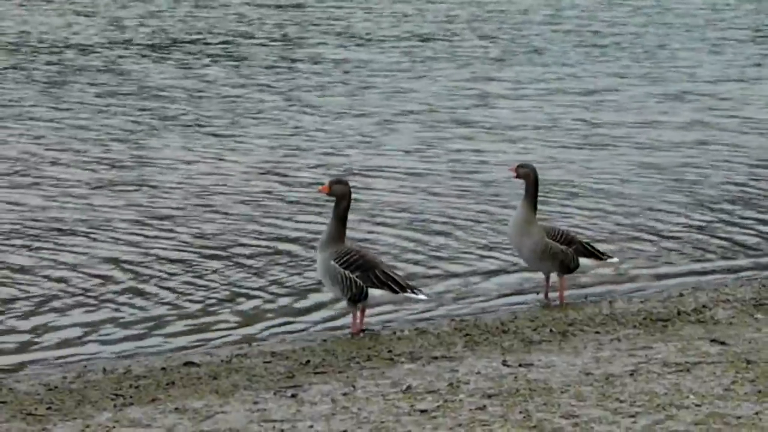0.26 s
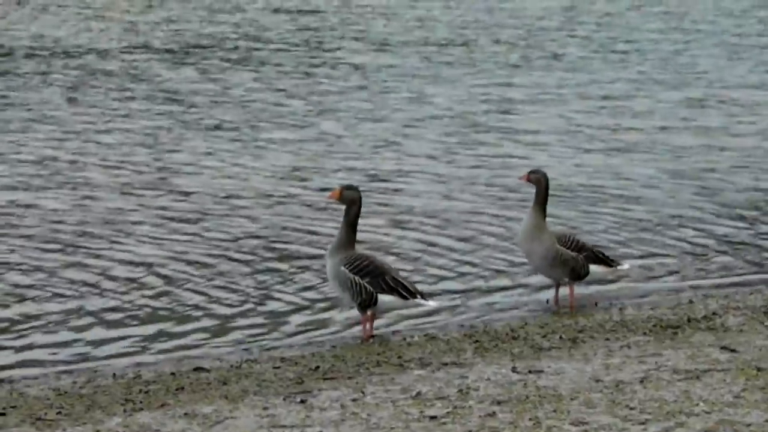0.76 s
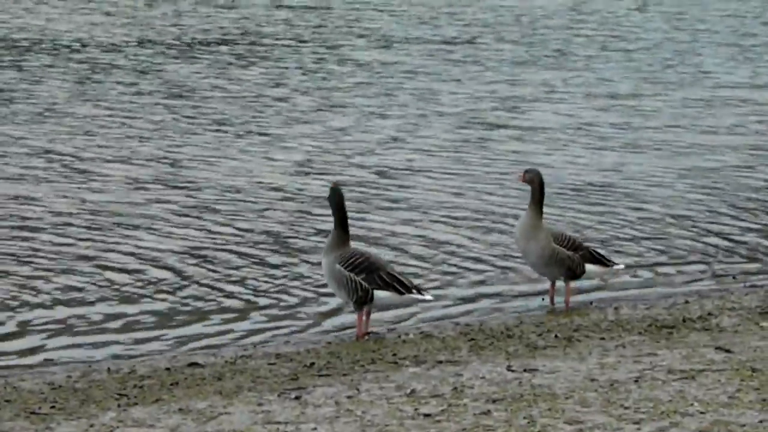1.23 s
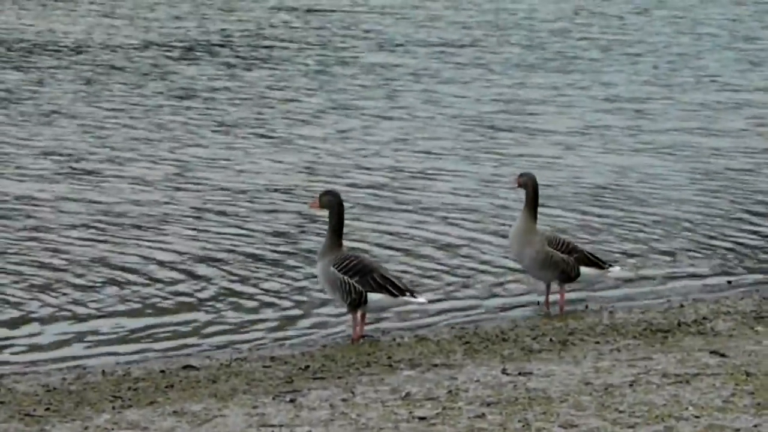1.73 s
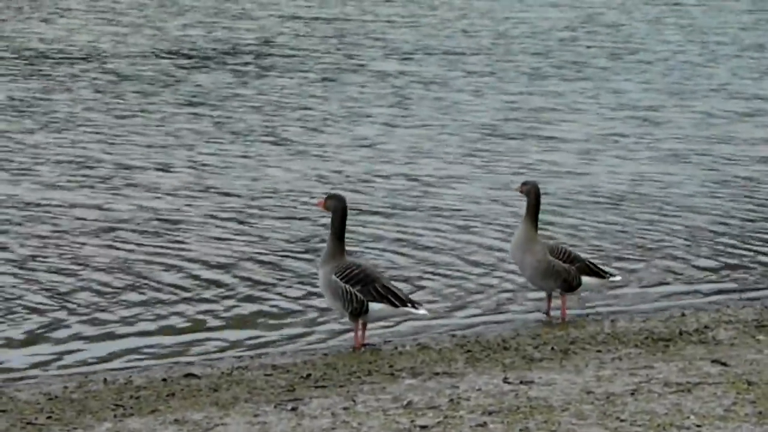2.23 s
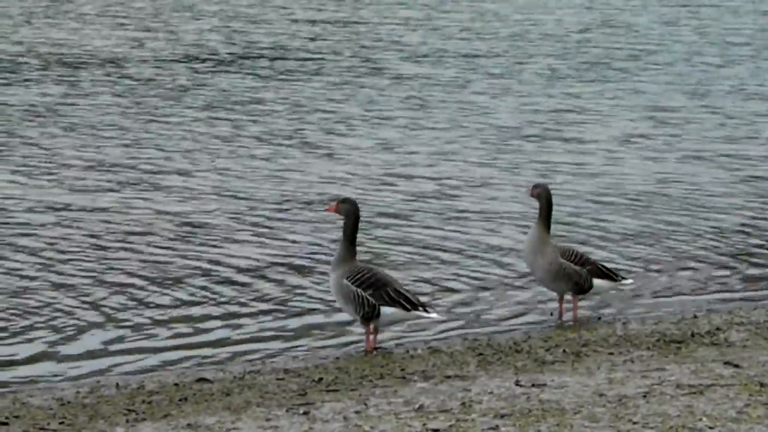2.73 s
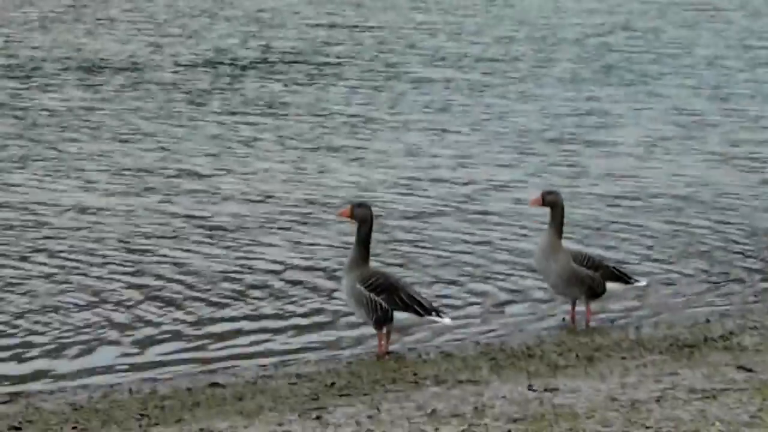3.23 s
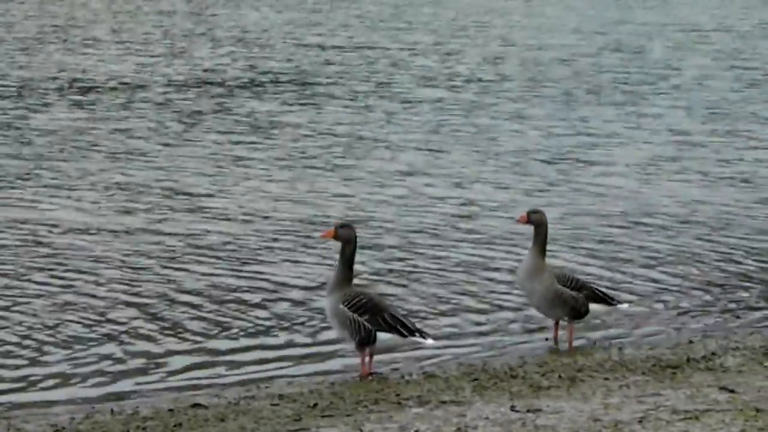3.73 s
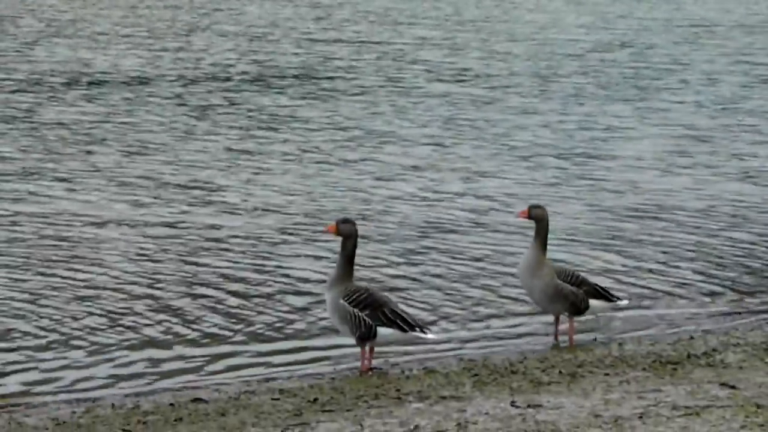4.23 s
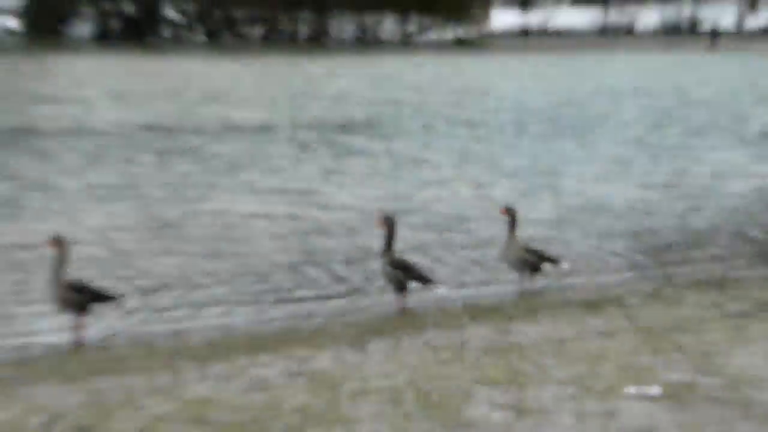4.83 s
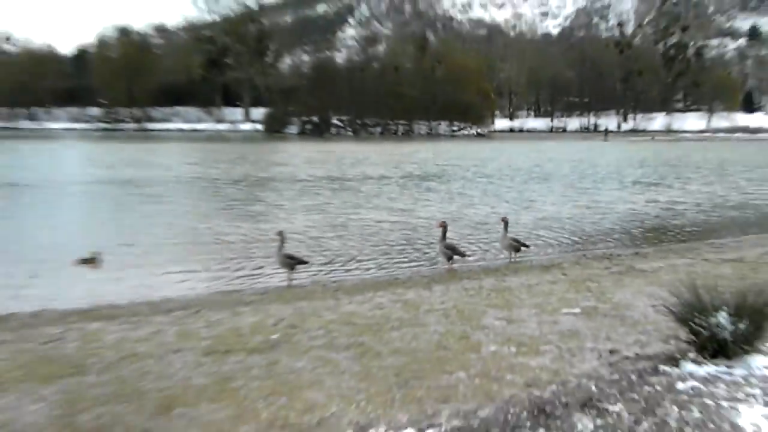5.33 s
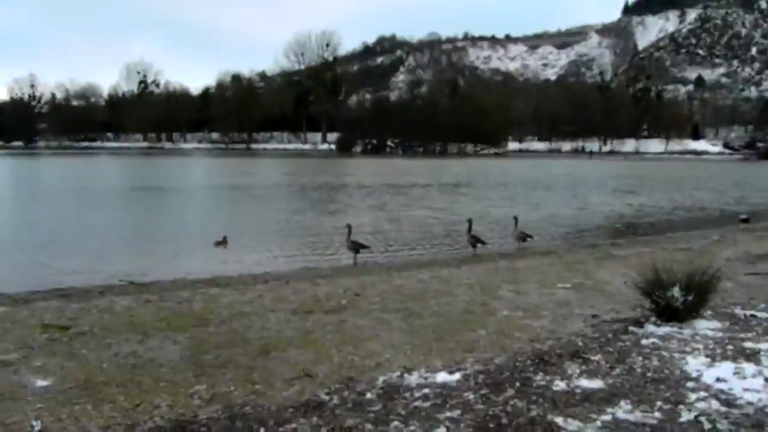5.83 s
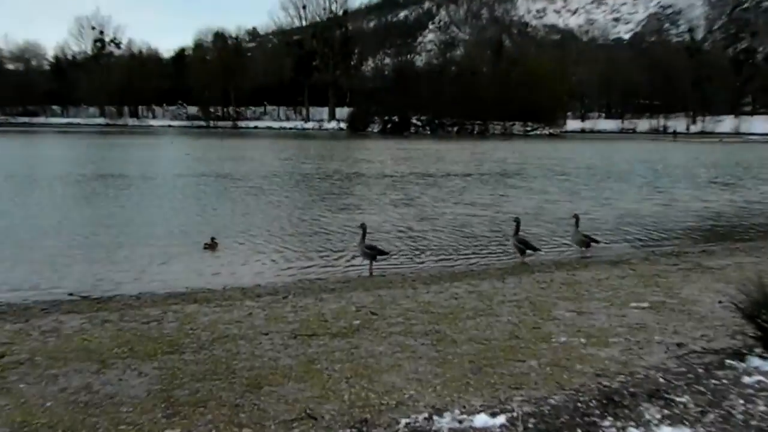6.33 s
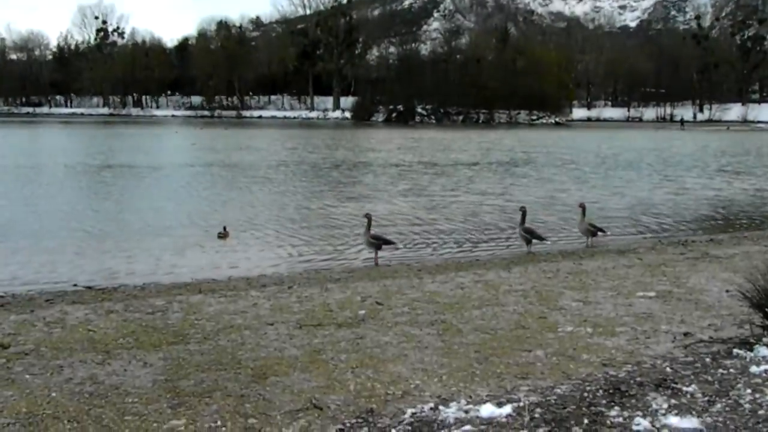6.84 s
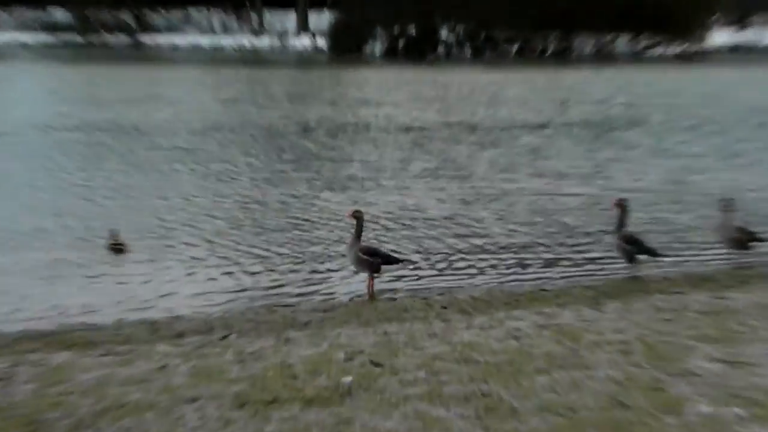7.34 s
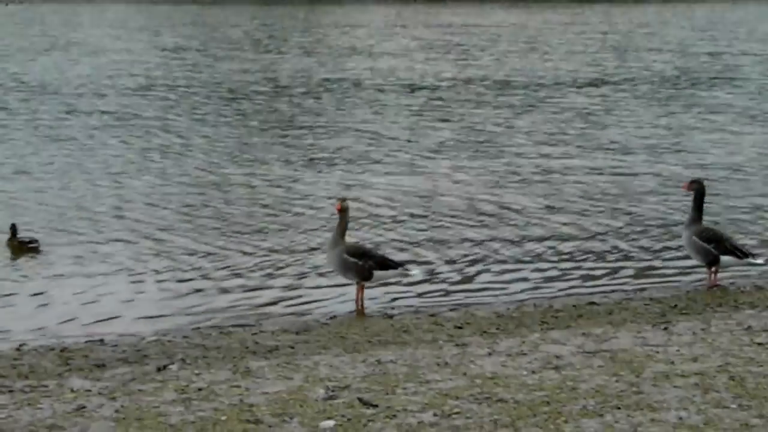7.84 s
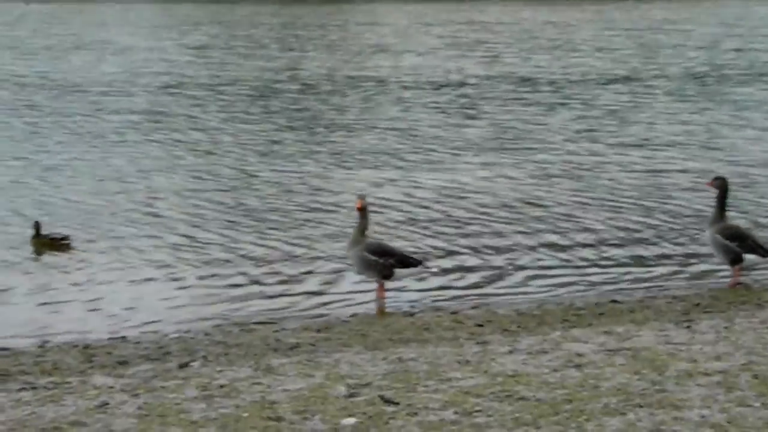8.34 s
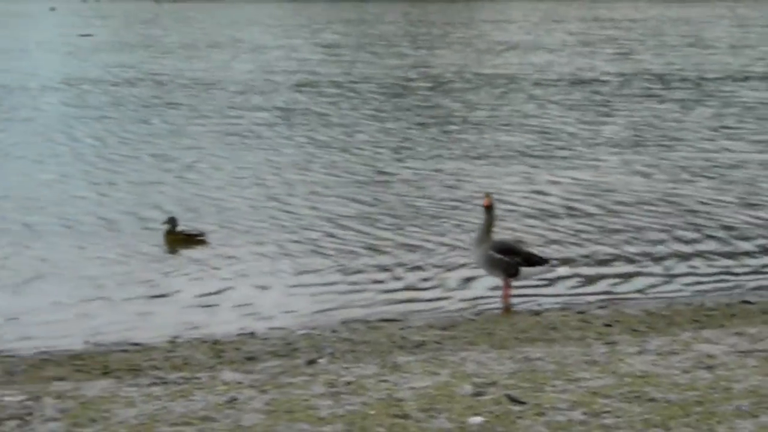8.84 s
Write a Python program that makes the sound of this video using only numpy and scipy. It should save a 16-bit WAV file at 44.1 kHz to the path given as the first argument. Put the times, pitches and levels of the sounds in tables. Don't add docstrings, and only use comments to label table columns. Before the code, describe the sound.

Irregular runs of bright, nasal goose honks, each about a tenth of a second, alternate with gravelly throat rasps and two deeper honks. After the midpoint the camera's thin zoom whine runs on and off, very close, with plastic ticks. Far whistling cries and a fading hiss follow, then small button clicks and two final honks. Open lakeside, low wind-and-water murmur, birds moderately near the microphone.

```python
import sys
import numpy as np
from scipy import signal
from scipy.io import wavfile
from scipy.ndimage import uniform_filter1d

SR = 44100
rng = np.random.default_rng(int(sys.argv[2]) if len(sys.argv) > 2 else 0)


def boost_factor(decibels):
    exponent = np.asarray(decibels, float) / 20
    return 10 ** exponent


def log_audio(samples):
    frames = np.atleast_2d(samples).T
    limited = np.clip(frames, -1, 1)
    pcm = np.round(limited * 32767).astype(np.int16)
    wavfile.write(sys.argv[1], SR, pcm)


N = 399987

# (time [s], level [dB])
WASH_COLOUR = [(30, -36), (42, -17), (60, -4.5), (120, -7.5), (200, -14), (310, -9), (500, -4.5), (800, 0),
               (1250, -4), (2000, -6), (2600, -16.5), (3500, -5), (5000, -19), (6500, -28), (15700, -35.5)]
WASH_LEVEL = [(0, -45.5), (2.299, -46.5), (4.499, -45), (6.801, -45), (9.07, -45)]
# (start [s], upper throat resonance [dB], lower one [dB], top pitch [Hz], pitch peaks after [s])
HONKS = [(-.14, 1, -15, 895, 0.068), (0.246, -14.5, -18.5, 887.7, 0.04), (0.616, -8.5, -18.5, 870, 0.036),
         (1.068, -12, -19, 884.3, 0.0407), (1.776, -15, -39, 892, 0.043), (1.856, -11.5, -29, 846, 0.061),
         (2.626, -11.5, -25.5, 880, 0.034), (2.915, -9, -19.5, 871, 0.05), (4.06, -12.5, -16, 888, 0.053),
         (4.679, -9.5, -20.5, 849, 0.025), (4.908, -10.5, -41, 941.5, 0.1), (4.99, -15.5, -25, 854, 0.028),
         (5.203, -9.5, -14, 885, 0.069), (5.554, -11, -15, 892, 0.059), (6.723, -13.5, -15, 889.3, 0.055),
         (6.97, -9.5, -15.5, 875, 0.062), (7.279, -12, -10.5, 900.6, 0.065),
         (8.598, -14.5, -14, 887, 0.036), (8.817, -14.5, -18, 875, 0.076)]
THIN_HONKS = [(0.252, -28, -39, 1085, 0.02), (1.782, -13, -34, 1150, 0.0697),
              (4.955, -44, -30.5, 1165, 0.035), (6.098, -34, -53, 1197, 0.0264),
              (6.207, -28, -55, 1213, 0.031)]
# (from [s], until [s], stutter left in [0-1], brightness [dB], voice breaks after [s])
HONK_CLEAR = [(-.11, -0.036, 0, -5, 0.13), (0.279, 0.381, 0.08, -9, 0.073),
              (0.634, 0.708, 0.14, -4, 0.0023), (1.078, 1.204, 0.03, -7.5, 0.072),
              (1.782, 1.826, 0.45, -2, 0.051), (1.879, 1.945, 0.1, -7.5, 0.013),
              (2.649, 2.757, 0.17, -8.5, 0.069), (2.931, 3.009, .12, -6.5, 0.001),
              (4.087, 4.182, 0.15, 1, 0.067), (4.705, 4.744, 0.06, -5.5, 0.00058),
              (4.92, 4.972, 0.04, 1.5, 0.067), (5.025, 5.049, 0.4, -5.5, 0.0036),
              (5.223, 5.313, 0.07, -3.5, 0.0014), (5.572, 5.705, 0.05, -2, 0.072),
              (6.738, 6.826, 0.05, -9, 0.055), (6.998, 7.077, 0, -7.5, 0.0011),
              (7.295, 7.42, 0.05, 1.5, 0.08), (8.611, 8.709, 0.17, -4, 0.055),
              (8.842, 8.951, 0, -9.5, 0.0026)]
THIN_CLEAR = [(0.257, 0.311, 0.59, 8, 0.0042), (1.805, 1.926, 0.2, -12, 0.026),
              (4.976, 5.01, 0.31, -37, .01), (6.108, 6.12, 0.28, -15, .1), (6.231, 6.21, 0.86, -11, .1)]
# (pitch lost [share/s], top held [ms], effort peaks after [ms], stuttering end [dB])
HONK_BENDS = [(1.3, 2, 32, -5.5), (0.79, 9.2, 50, 1.5), (2.8, 4.7, 31, 0), (.95, 4.5, 41, -2),
              (3.6, 7.1, 67, 0), (3.3, 1.1, 44, 2), (0.37, 2, 65, -7.5), (3.1, 3.1, 31, -1),
              (1.1, 4.6, 57, 0), (1.3, 2.8, 43, -6), (1.4, 2, 7.3, 4.5), (0.88, 1.6, 25, -0.5),
              (2.6, 6.3, 64, -4.5), (0.55, 3, 48, 3), (1.8, 2.9, 43, -1.5), (2.1, 3.3, 54, -3),
              (1.4, 4.5, 23, 2.5), (1.1, 6.8, 33, 0), (4.5, 12, 59, -6)]
THIN_BENDS = [(1.2, 2.2, 11, -1.7), (0.48, 20, 89, -2.2), (0.95, 7.9, 36, -1.4), (1.4, 1, 29, -0.25),
              (1.9, 1, 66, -0.22)]
# (frequency [Hz], level [dB])
THROAT_LOW = [(600, -32.5), (870, -32), (1750, -35.5)]
THROAT_LOWER = [(2350, 11.5), (2650, -1.5), (3000, -14.5)]
THROAT_UPPER = [(3500, 0)]
THROAT_CLOSING = [(4400, -13)]
THROAT_TOP = [(5200, -13), (6100, -32.5), (7100, -27.5), (7900, -36.5), (8800, -30), (9700, -47),
              (10500, -56), (14000, -63)]
# (from [s], until [s], depth [0-1])
DOUBLING = [(.255, .325, .4), (1.79, 1.9, .5), (4.935, 4.985, .55), (4.99, 5.05, .6), (7.315, 7.38, .4),
            (7.42, 7.47, .6)]
SIDE_ABOVE_DB = [-20.5, -6.5, -53.5, -5, -4.5, -12.5, -35.5, -24.5, -24, -27.5]
SIDE_BELOW_DB = [-26, -50.5, -12, -13.5, -9, -10, -35, -32.5, -37, -23]
# (time [s], peak [dB], ring [Hz], treble [dB])
TICKS = [(0.103, -27.5, 1920, -50), (0.209, -24.5, 2170, -18), (0.475, -30, 1840, -43),
         (0.567, -38, 1820, -22), (1.205, -11.5, 2360, -33), (2.433, -30.5, 895, -20),
         (2.758, -15.5, 815, -18), (2.779, -20, 2030, -26), (3.201, -29, 1650, -23),
         (3.216, -22, 3860, -23), (3.555, -19.5, 1110, -22), (3.963, -20.5, 1670, -16.5),
         (4.042, -21.5, 3860, 0), (4.376, -19, 2000, -16), (4.413, -13.5, 3080, -31),
         (4.469, -11, 2970, -29), (5.926, -11, 2930, -40), (5.999, -15, 3200, -23),
         (6.567, -12.5, 1480, -16), (6.711, -18, 3520, -5), (6.88, -22.5, 3680, -5),
         (7.559, -8.5, 2340, -6.5), (8.195, -28.5, 2860, -21), (8.452, -19, 4760, -32),
         (8.457, -18, 3750, -17), (8.494, -28, 3680, -17), (8.793, -21.5, 3450, -45),
         (8.998, -15.5, 3640, -71),
         (2.566, -3, 4830, -12),
    (2.569, -15.5, 4020, -36),
    (2.582, -3, 3550, -5),
    (2.592, -4.5, 4700, -11),
    (2.601, -14, 3430, -51),
]
# (frequency [Hz], level [dB per Hz])
TICK_COLOUR = [(240, -59.5), (400, -55.5), (739, 4.5), (1100, 1), (2270, 6), (3650, -1), (6150, -4.5),
               (7750, -16.5), (8490, -7.5), (15700, -53)]
# (time [s], peak
# [dB], ring [Hz])
SNAPS = [
    (.208, -27, 2100),
    (1.2048, -2.5, 1900),
    (1.322, -17, 1900),
    (1.332, -20, 2000),
    (1.3765, -23, 1750),
    (1.4495, -11, 1850),
    (1.4555, -9, 1900),
    (1.4595, -11, 1850),
    (1.541, -10, 1900),
    (2.214, -6, 1850),
]
# (start [s], length [s], level [dB], middle of the strong-weak beats [s])
RASPS = [
    (0.741, 0.12, -24.5, .85),
    (1.367, .18, -21, 1.496),
    (2.116, 0.172, -20, 2.229),
    (2.913, .145, -21.5, 3.016),
    (3.603, 0.16, -21.5, 3.71),
]
# (frequency [Hz], width [Hz], level [dB])
RASP_THROAT = [(1818, 315, 3), (1282, 87, -11), (2205, 130, -22)]
RASP_BILL = [(3060, 1300, -12.5), (4070, 270, -15), (5310, 830, -18.5), (6800, 700, -25.5),
             (7100, 270, -38), (8800, 630, -50.5)]
# (start [s], length [s], level [dB], top pitch [Hz], brightness [dB])
DEEP_HONKS = [
    (1.246, 0.12, -17.5, 596.5, -6.5),
    (7.578, 0.12, -14.5, 606, -2),
]
# (multiple, level [dB])
DEEP_TONES = [(1, -18), (2, -16), (3, -9.5), (4, -2), (5, -15.5), (6, -6), (7, -5.5), (8, -3.5), (9, -11),
              (10, -18), (11, -34.5), (12, -15.5), (13, -19), (14, -8), (15, -15.5), (16, -20.5)]
# (time [s], pitch [Hz], level [dB])
TRILL = [
    [(2.03, 3740, -66), (2.056, 3599, -82), (2.13, 3630, -60)],
    [(2.3, 3685, -73), (2.338, 3760, -70), (2.55, 3450, -85)],
    [(6.44, 3650, -46.5), (6.6, 3660, -43.5), (6.645, 3800, -51)],
]
# (time [s], peak [dB])
SPARKS = [
    (2.565, -27),
    (5.989, -35.5),
    (6.083, -41),
    (6.186, -53.5),
    (6.395, -41),
    (6.568, -31),
    (7.56, -22.5),
]
# (time [s], level [dB])
HISSES = [
    [(3.22, -75), (3.634, -47.5), (3.78, -54.5)],
    [(7.6, -48.5), (7.824, -50.5), (8.15, -59.5)],
]
# (frequency [Hz], level [dB per Hz])
HISS_COLOUR = [(1180, -56), (2000, -5), (2980, -2.5), (4060, -1), (6050, 0.5), (7790, -26), (8950, -14),
               (14000, -47.5)]
# (time [s], peak [dB])
THUMPS = [
    (3.962, -26.5),
    (4.472, -19.5),
    (5.958, -25),
    (6.568, -26),
]
# (time [s], level [dB])
ZOOM_RUNS = [
    [(4.44, -52.5), (4.55, -53.5), (5.78, -56.5)],
    [(5.915, -50.5), (6.07, -55.5)],
    [(6.26, -52), (6.435, -54.5)],
    [(6.96, -57.5), (7.15, -53.5), (7.66, -56)],
]
# (frequency [Hz], level [dB per Hz])
GEAR_COLOUR = [(180, -44), (300, -9.5), (425, -50), (810, -37.5), (880, -40), (925, -19), (2420, 1),
               (2900, -4.5), (4690, -5), (6210, -4.5), (7830, -18), (8650, -19.5), (15700, -39.5)]
# (frequency [Hz], width [Hz], level [dB])
WHINES = [(3020, 420, 0), (3550, 400, -5), (5800, 700, -20), (11700, 700, -32), (14600, 600, -36)]
# (time [s], pitch [Hz], level [dB])
FAR_CRIES = [
    [(7.06, 930, -53), (7.076, 1133, -34.5), (7.136, 1089, -39), (7.17, 930, -46)],
    [(7.2, 930, -39), (7.232, 1138, -38), (7.254, 1168, -39.5), (7.31, 930, -39)],
    [(7.4, 941, -48), (7.412, 1140, -38), (7.516, 1048, -45), (7.56, 1167, -30)],
    [(7.58, 1193, -39), (7.652, 1208, -53), (7.692, 1124, -40), (7.72, 1207, -41)],
]
# (time [s], peak [dB])
BUTTON_CLICKS = [
    (8.226, -17.5),
    (8.233, -21),
    (8.325, -20.5),
    (8.3297, -15),
    (8.426, -14.5),
    (8.433, -18.5),
]
# (frequency [Hz], level [dB], time to die by 60 dB [s])
BUTTON_MODES = [(3450, -1.5, 0.02), (3860, -5, 0.022), (2640, -21, 0.043), (5300, -13.5, 0.0091),
                (7050, -31, .02)]
# (frequency [Hz], width [Hz], share removed [0-1])
NOTCHES = [(7860, 330, 0.95), (195.4, 140, 0.83)]


def evened(x):
    return x / np.sqrt(np.mean(x ** 2) + 1e-20)


def add(mix, s, sound):
    part = mix[round(s * SR):][:len(sound)]
    part += sound[:len(part)]


def unroll(rows):
    s, *columns = np.transpose(rows)
    t = np.arange(s[0], s[-1], 1 / SR)
    return t, *(np.interp(t, s, c) for c in columns)


def resonate(x, hz, width_hz):
    turn = np.exp(2j * np.pi * np.cumsum(hz * np.ones(len(x))) / SR)
    r = np.exp(-np.pi * width_hz / SR)
    return 2 * (turn * signal.lfilter([1 - r], [1, -r], x / turn)).real


def resonate_twice(x, hz, width_hz):
    return resonate(resonate(x, hz, width_hz), hz, width_hz)


def wander(n, hz, size=16000):
    slow = signal.lfilter(*signal.butter(2, hz, fs=SR), rng.standard_normal(size))
    return evened(slow[4000:])[:n]


def noise(colour, patchy_db, size):
    hz = np.fft.rfftfreq(1024, 1 / SR)
    f, db = np.transpose(colour)
    a, b, patches = rng.standard_normal((size // 256 + 5, 513, 3)).T
    patches = uniform_filter1d(patches, size=10, axis=0)
    patches = evened(uniform_filter1d(patches, size=12, axis=1))
    colour_db = np.interp(np.log(hz + 1), np.log(f), db)[:, None]
    z = (a + 1j * b) * boost_factor(colour_db + patchy_db * patches)
    return evened(signal.istft(z, nperseg=1024, noverlap=768)[1][:size])


def outdoor_wash():
    level = boost_factor(np.interp(np.arange(N) / SR, *np.transpose(WASH_LEVEL)))
    hum = evened(resonate(rng.standard_normal(N), 61, 2.2))
    return level * noise(WASH_COLOUR, 2.2, size=N) + boost_factor(-70) * hum


def phrase(call, clear, bend, steep):
    start, upper_db, lower_db, top_hz, top_s = call
    begin, stop, break_s = clear[0] - start, clear[1] - start, clear[4]
    sag_per_s, hold_ms, peak_ms, end_db = bend
    lead_s, tail_s, swell_s = .006, 0.056, .014
    t = np.arange(max(-start, -lead_s), stop + tail_s, 1 / SR)
    late = break_s > .04
    tail = np.maximum((t - stop) / tail_s, 0)

    round_s = 0.0228
    rise = .085 * np.exp(-t / (0.306 * top_s))
    sag = sag_per_s * (np.hypot(np.maximum(t - top_s - hold_ms / 1000, 0), round_s) - round_s)
    drop = late * 0.0205 * np.clip((t - break_s) / 0.006 + 0.077, 0, 1)
    hz = top_hz * (1 - steep * (rise + sag) - drop - .045 * tail)

    onset_db = -14 * np.maximum(1 - (t + lead_s) / .012, 0)
    swell_db = -5 * np.clip((begin - t) / swell_s + .5, 0, 1)
    off_peak = (t - peak_ms / 1000) / 0.031
    arch_db = -4 * off_peak ** 2 / (1 + abs(off_peak))
    wilt_db = -5 * np.clip((t - stop) / 0.018 + 1, 0, 1) * np.clip((stop - t) / 0.0027 + 1, 0, 1)
    die_db = end_db * np.clip((t - stop) / 0.0033, 0, 1) - 28 * tail ** 2.65
    effort_db = onset_db + swell_db + arch_db + wilt_db + die_db

    crack_s = .005
    crack_db = late * -8 * np.exp(-((t - break_s - crack_s) / crack_s) ** 2)
    break_db = -7 * np.clip((t - break_s) / 0.008, 0, 1)
    upper_db = upper_db + crack_db + break_db - 50.5 * np.maximum(t - break_s, 0)
    waiting = np.clip((break_s + 0.018 * (break_s > .02) - t) / .045, 0, 1)
    lower_db = lower_db - 12 * waiting * np.clip((t - begin) / swell_s + 1, 0, 1)
    both_db = 10 * np.log10(boost_factor(2 * upper_db) + boost_factor(2 * lower_db))
    return start + t, both_db + effort_db, hz, upper_db - both_db


def throat_colour(t, call, clear, effort_db, share_db, low_db, open_db):
    stop, bright_db = clear[1], clear[3]
    share_db = np.minimum(share_db, 0)
    after_break = t - call[0] - clear[4]
    upper_db = effort_db + share_db
    lower_db = effort_db + 10 * np.log10(np.maximum(1 - boost_factor(2 * share_db), .006))
    shut = np.clip((after_break - .025) / 0.0054, 0, 1)
    closing_db = effort_db + open_db + np.where(clear[4] > .02, -1.0 - 11 * shut, 1.5)
    end_db = np.clip((t - stop) / 0.0065, 0, 1)
    dull_db = (clear[4] > .04) * 133.5 * np.maximum(after_break, 0)
    top_db = 0.45 * effort_db + 0.26 * upper_db + bright_db + end_db - dull_db
    zones = [(THROAT_LOW, 0.54 * (effort_db + 15.0) + low_db),
             (THROAT_LOWER, lower_db), (THROAT_UPPER, upper_db),
             (THROAT_CLOSING, closing_db), (THROAT_TOP, top_db)]
    return zip(*[(f, db + level_db) for points, level_db in zones for f, db in points])


def honk(call, clear, bend, flutter_hz, wobble, low_db=0, steep=1, open_db=0, doubled=1):
    t, effort_db, hz, share_db = phrase(call, clear, bend, steep)
    n, (start, stop, left) = len(t), clear[:3]
    stutter = np.interp(t, [start - .008, start, stop, stop + 0.0076], [.9, left, left, .8])
    stutter = np.clip(stutter, 0, 1)
    wild = 1 - .25 * (t > stop)
    flutter = flutter_hz * (1.4 - 0.22 * stutter) * (1 + 0.194 * wild * wander(n, 77))
    cycle = np.cumsum(flutter) / SR + rng.random()
    gate = evened(0.15 + boost_factor(1.8 * wander(n, 60)) * np.sin(np.pi * (cycle % 1) ** 0.43) ** 1.98)

    hz = uniform_filter1d(hz, size=500, mode="nearest")
    shake = 0.0045 * wander(n, 54) + wobble * wild * stutter * wander(n, 280)
    turns = np.cumsum(hz * (1 + shake)) / SR
    f, colour_db = throat_colour(t, call, clear, effort_db, share_db, low_db, open_db)
    voice = np.zeros(n)
    for k in range(1, 16):
        place = np.interp(k * 0.9892 * hz.max(), f, np.arange(len(f)))
        below = min(int(place), len(f) - 2)
        db = colour_db[below] + (place - below) * (colour_db[below + 1] - colour_db[below])
        db = db + np.clip(1.2 * (k - 3.5), 0, 4) * wander(n, 12) * (k > 5)
        voice += boost_factor(db) * np.cos(2 * np.pi * (k * turns + rng.random())) * (k * hz < 15000)

    half = doubled * sum(np.interp(t, [a - .008, a + 0.027, b - .008, b + 0.0058], [0, depth, depth, 0])
                         for a, b, depth in DOUBLING)
    second = np.cumsum(243 * (1 + .015 * wander(n, 40))) / SR
    sides = np.zeros(n)
    for k, (above_db, below_db) in enumerate(zip(SIDE_ABOVE_DB, SIDE_BELOW_DB), start=1):
        sides += boost_factor(above_db) * np.cos(2 * np.pi * (k * turns + second + k ** 2 / 7))
        sides += boost_factor(below_db) * np.cos(2 * np.pi * (k * turns - second))
    voice = voice * (1 + .3 * half * np.cos(2 * np.pi * second)) + half * boost_factor(effort_db) * sides

    air = noise(TICK_COLOUR, 3, size=11000)[:n]
    breath = boost_factor(effort_db - 13.5) * (wild * stutter + 0.053) * (air + 5 * stutter * resonate(air, 2045, 250))
    grit = half * boost_factor(effort_db - 18) * evened(resonate_twice(air, 9030, 1100))
    sound = np.sqrt(2) * voice + breath + grit
    return t[0], sound * (1 - stutter + stutter * gate) * signal.windows.tukey(n, .05)


def shore(x):
    t = np.arange(13000) / SR
    hits = rng.choice([-1., 1.], len(t)) * (rng.random(len(t)) < 2000 / SR)
    taps = hits * boost_factor(-60 * t / 0.31) * (t > .004)
    return signal.fftconvolve(x, taps / np.linalg.norm(taps))[:N]


def tick(s, db, hz, treble_db):
    t = np.arange(1300) / SR
    crack = noise(TICK_COLOUR, 2.9, size=1300)
    dull = signal.sosfilt(signal.butter(3, 5000, fs=SR, output="sos"), crack)
    ring = evened(resonate(crack, hz, 290))
    crack = dull + 2.0 * ring + boost_factor(treble_db + 22.0) * (crack - dull)
    crack = crack * boost_factor(-60 * t / 0.032) * np.minimum(t / 0.00031, 1)
    return s - .001, boost_factor(db - 4.0) * crack / abs(crack).max()


def snap(s, db, hz):
    t = np.arange(600) / SR
    return s, boost_factor(db - 60 * t / 0.014) * np.sin(2 * np.pi * hz * t) * np.minimum(t / 0.0023, 1)


def rasp(start, length, top_db, limp_s):
    t, db = unroll([(start, -17), (start + 0.7 * length, 0), (start + length, -1.5)])
    db, n = db + top_db, len(t)
    opening = np.minimum((t - start) / length / 0.52, 1)
    hz = 135 + 42 * np.sqrt((t - start) / length)
    cycle = np.cumsum(hz * (1 + .06 * wander(n, 80))) / SR
    cycle = cycle - np.interp(limp_s - .001, t, cycle)
    beats, between = (np.diff(np.floor(cycle + late), prepend=np.floor(cycle[0] + late)) for late in (0, .5))
    limp_db = 4.5 * np.exp(-((t - limp_s) / .03) ** 2) * (-1) ** np.floor(cycle)
    strength = boost_factor(1.2 * wander(n, 120) + limp_db)
    pulses = beats * strength + .3 * between * boost_factor(3 * wander(n, 120))
    puffs = (.12 + np.exp(-(cycle % 1) / .3)) * rng.standard_normal(9000)[:n]
    drive = evened(pulses) + .5 * puffs

    shut = 1 - 0.14 * (1 - opening)
    sway = 1 + .035 * wander(n, 90)
    throat, bill = np.zeros(n), np.zeros(n)
    for f, width_hz, g in RASP_THROAT:
        ring = resonate(drive, f * shut * sway, width_hz)
        throat += boost_factor(g) * evened(resonate_twice(ring, f * shut, 1500))
    for f, width_hz, g in RASP_BILL:
        bill += boost_factor(g + 2.0 * wander(n, 60)) * evened(resonate_twice(puffs + 0.3 * drive, f, width_hz))
    chest = boost_factor(-27.5) * evened(resonate(resonate(drive, 2 * hz, 110), 2 * hz, 160))
    edges = np.clip(np.minimum(t - start, t[-1] - t) / .003, 0, 1)
    return t[0], boost_factor(db - 0.5) * (throat + bill + chest) * edges


def deep_honk(start, length, db, top_hz, bright_db):
    t = np.arange(-.018, length, 1 / SR)
    n, along = len(t), np.maximum(t / length, 0)
    hz = top_hz * (1 - .05 * ((along - .38) / 0.52) ** 2)
    turns = np.cumsum(hz * (1 + 0.0024 * wander(n, 70))) / SR
    tones = np.zeros(n)
    for k, g in DEEP_TONES:
        upper_db = (k > 5) * (bright_db * (k - 4) / 4 - 8.5 * along ** 2)
        tones += boost_factor(g + 1.3 * wander(n, 19) + upper_db) * np.cos(2 * np.pi * (k * turns + 0.11 * k ** 2 / 16))
    air = noise(TICK_COLOUR, 3, size=11000)[:n]
    air = evened(resonate(air, 3700, 1300) + 0.67 * resonate(air, 2300, 340))
    air = air * (0.19 + np.cos(np.pi * 165 * t) ** 2)
    husk = boost_factor(-3 - 3.5 * (t < 0)) * np.exp(-np.maximum(t / 0.03, 0) ** 2) * air
    edges = np.clip(t / 0.0038, 0, 1) * np.clip((length - t) / 0.0058, 0, 1)
    fade = boost_factor(-10 * ((along - .2) / 0.8) ** 2)
    return start + t[0], boost_factor(db) * (fade * edges * tones + husk * signal.windows.tukey(n, .05))


def thin_tone(rows, throb_hz, depth, blur, side=0, sharp=1.3):
    t, hz, db = unroll(rows)
    n = len(t)
    turn = 2 * np.pi * np.cumsum(hz * (1 + blur * wander(n, 120, size=30000))) / SR
    tone = np.cos(turn) + side * np.cos(1.27 * turn)
    beat = 2 * np.pi * np.cumsum(throb_hz * (1 + 0.071 * wander(n, 22, size=30000))) / SR
    throb = (1 + depth * np.cos(beat)) ** sharp
    return t[0], boost_factor(db) * evened(tone * throb) * signal.windows.tukey(n, .15)


def spark(s, db):
    t = np.arange(300) / SR
    band = signal.butter(2, [8500, 14500], "bandpass", fs=SR, output="sos")
    return s - .001, boost_factor(db - 60 * t / 0.014) * signal.sosfilt(band, rng.standard_normal(300))


def hiss(rows):
    t, db = unroll(rows)
    air = noise(HISS_COLOUR, 2.8, size=30000)[:len(t)]
    return t[0], boost_factor(db + 6.0) * air * signal.windows.tukey(len(t), .1)


def thump(s, db):
    t = np.arange(2200) / SR
    band = signal.butter(2, [300, 1500], "bandpass", fs=SR, output="sos")
    scuff = signal.sosfilt(band, rng.standard_normal(2200))
    scuff = scuff * boost_factor(-60 * t / 0.057) * np.minimum(t / 0.0029, 1)
    return s, boost_factor(db) * scuff / abs(scuff).max()


def zoom(rows):
    t, db = unroll(rows)
    white = rng.standard_normal(66000)
    whine = sum(boost_factor(g) * evened(resonate_twice(white, f, width_hz)) for f, width_hz, g in WHINES)
    grind = noise(GEAR_COLOUR, 2, size=66000)
    gears = (grind + whine) * boost_factor(2 * wander(66000, 280, size=70000))
    return t[0], boost_factor(db + 13.0) * gears[:len(t)] * signal.windows.tukey(len(t), .03)


def button(s, db):
    t = np.arange(2200) / SR
    ring = sum(boost_factor(g - 60 * t / t60) * np.sin(2 * np.pi * (f * t + rng.random())) for f, g, t60 in BUTTON_MODES)
    return s - .001, boost_factor(db) * ring / abs(ring).max() * np.minimum(t / 0.00081, 1)


def scene():
    birds, camera = np.zeros(N), np.zeros(N)
    for call, clear, bend in zip(HONKS, HONK_CLEAR, HONK_BENDS):
        add(birds, *honk(call, clear, bend, flutter_hz=174.5, wobble=0.046))
    thin = list(zip(THIN_HONKS, THIN_CLEAR, THIN_BENDS))
    for row in thin[:3]:
        add(birds, *honk(*row, flutter_hz=132.3, wobble=0.043, low_db=7.5, steep=2.1, doubled=0))
    for row in thin[3:]:
        add(birds, *honk(*row, flutter_hz=84, wobble=0.032, low_db=-23, steep=2.1, open_db=7))
    for row in TICKS:
        add(camera, *tick(*row))
    for row in SNAPS:
        add(birds, *snap(*row))
    for row in RASPS:
        add(birds, *rasp(*row))
    for row in DEEP_HONKS:
        add(birds, *deep_honk(*row))
    for rows in TRILL:
        add(birds, *thin_tone(rows, throb_hz=102, depth=.98, blur=.03, side=.5, sharp=7))
    for row in SPARKS:
        add(camera, *spark(*row))
    for rows in HISSES:
        add(birds, *hiss(rows))
    for row in THUMPS:
        add(camera, *thump(*row))
    for rows in ZOOM_RUNS:
        add(camera, *zoom(rows))
    for rows in FAR_CRIES:
        add(birds, *thin_tone(rows, throb_hz=26.9, depth=0.23, blur=0.025))
    for row in BUTTON_CLICKS:
        add(camera, *button(*row))
    return (birds + boost_factor(-24) * shore(birds) + camera + outdoor_wash())[None]


def top_cut(x):
    return signal.sosfilt(signal.butter(12, 16000, fs=SR, output="sos"), x)


def record(dry):
    x = dry[0]
    for hz, width_hz, share in NOTCHES:
        x = x - min(share, 1) * resonate(x, hz, width_hz)
    x = x / (1 + abs(x / .68) ** 6) ** (1 / 6)
    return top_cut(x[None])


dry = scene()
out = record(dry)
log_audio(out)
```